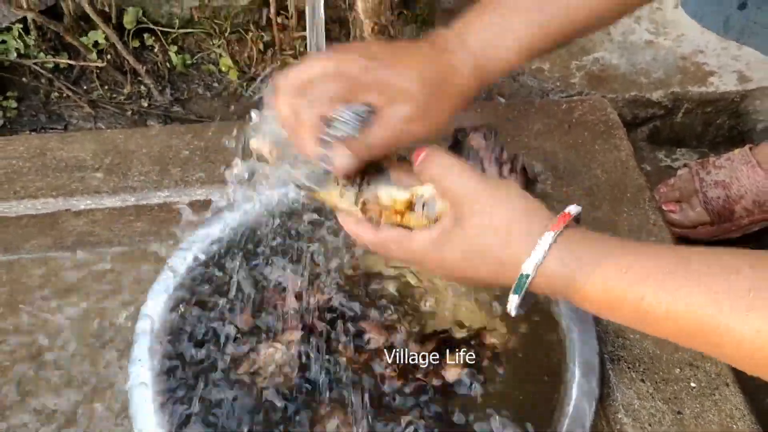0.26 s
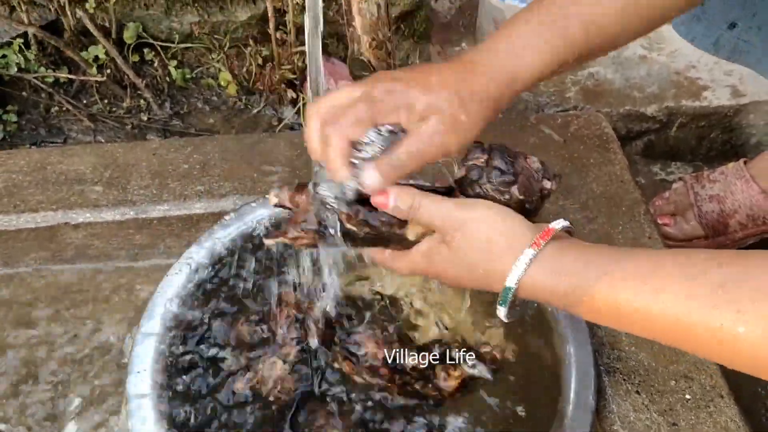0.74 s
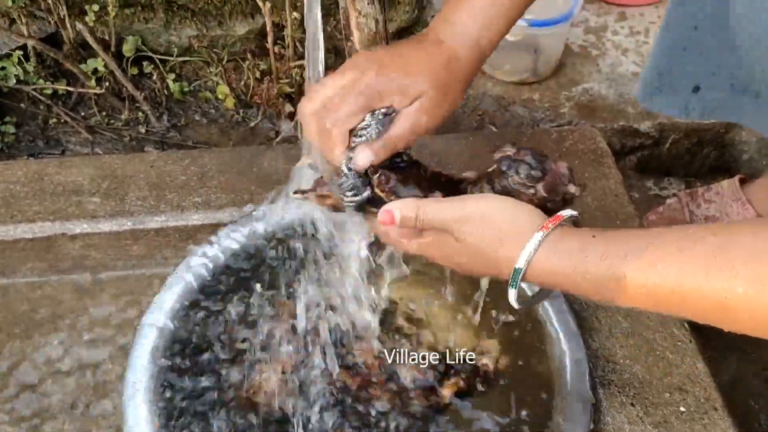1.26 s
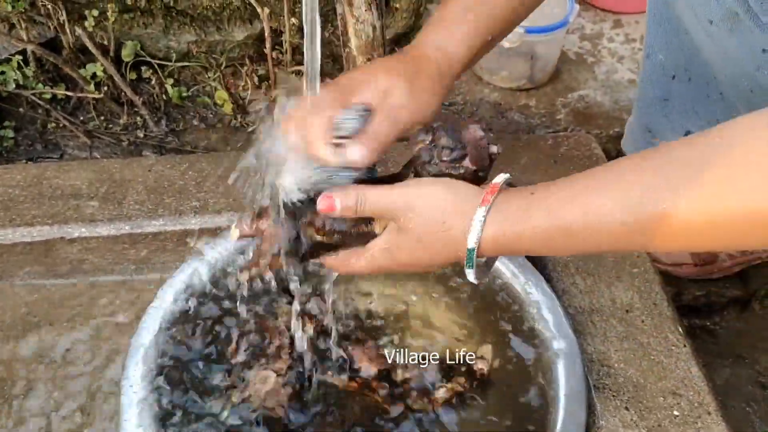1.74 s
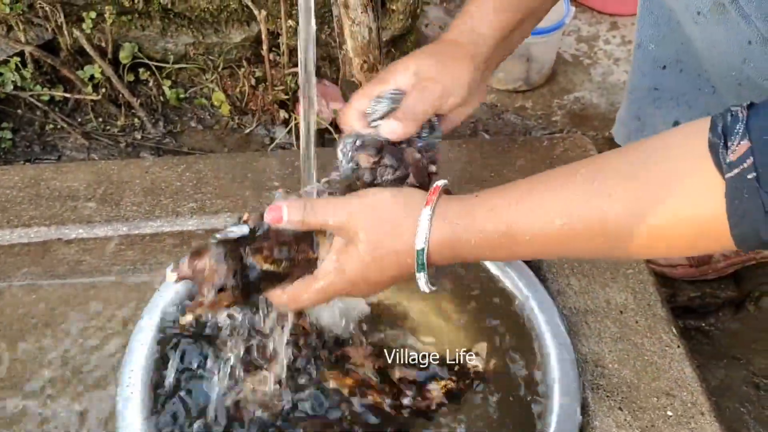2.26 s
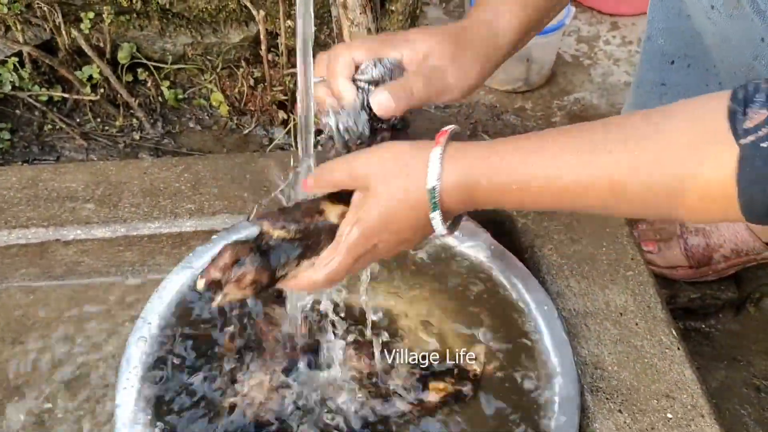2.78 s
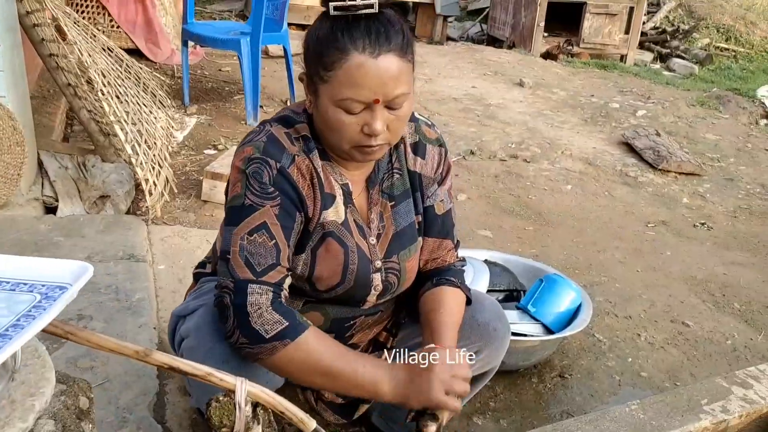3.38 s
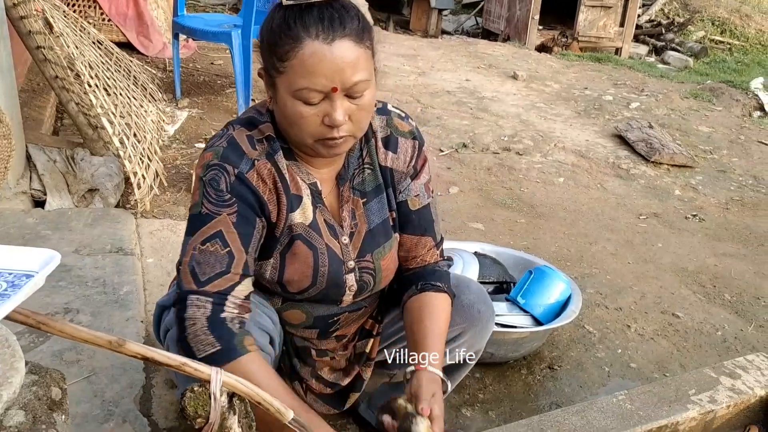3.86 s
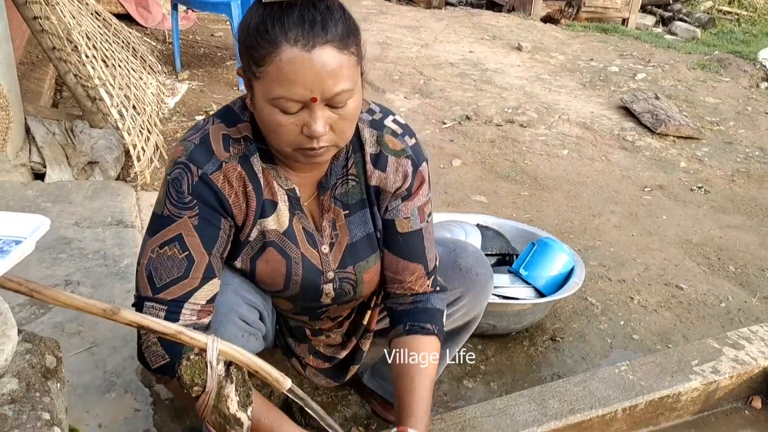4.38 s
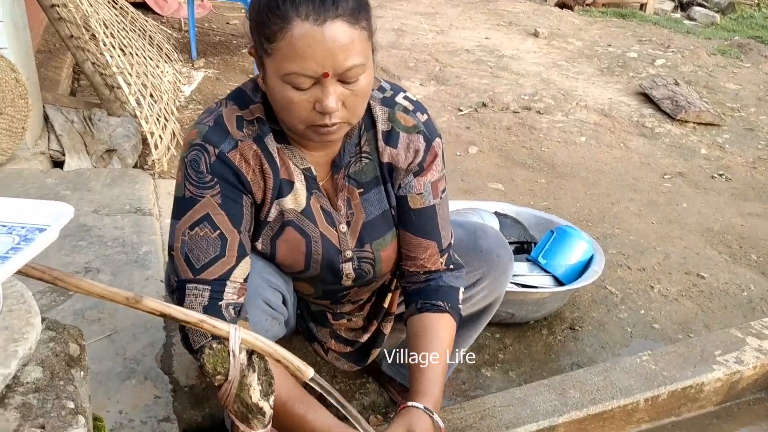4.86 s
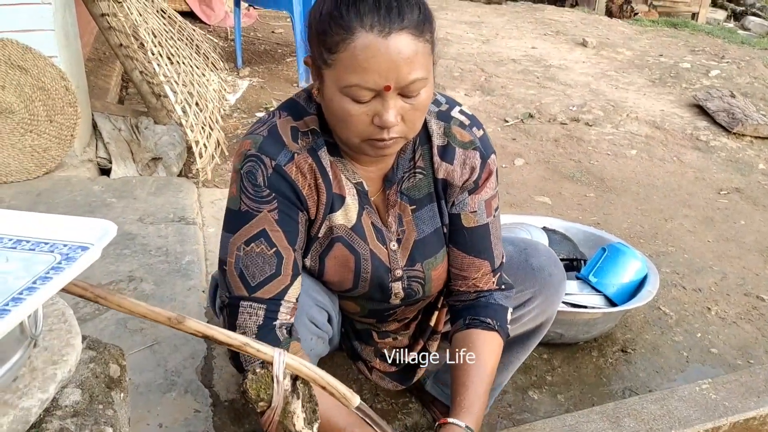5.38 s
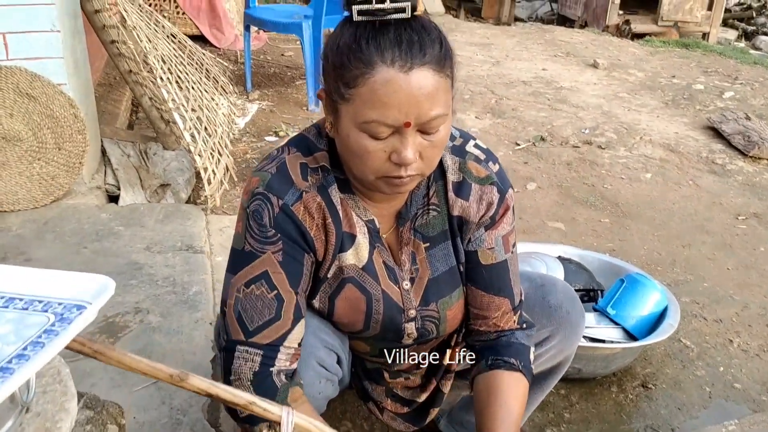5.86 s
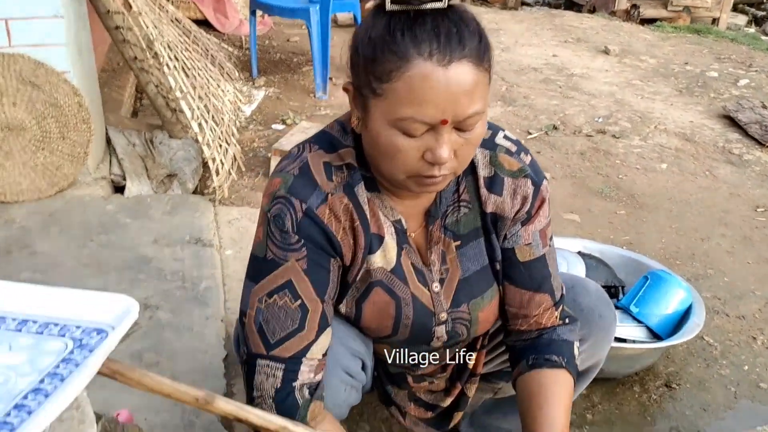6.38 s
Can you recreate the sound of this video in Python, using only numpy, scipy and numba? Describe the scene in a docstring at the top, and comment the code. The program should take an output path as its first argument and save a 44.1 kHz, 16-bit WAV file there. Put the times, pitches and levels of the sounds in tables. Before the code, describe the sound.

Outdoors, a steady stream falls into a water-filled steel basin, heard very close in stereo: bright ringing bubbles, spray hiss, quick plops and slaps as washing hands cut the flow. Just before three seconds a dull bump comes, then the same water sounds from a step away, softer and differently coloured, with glugs, occasional splashes and soft handling thuds over a low rumble. A short puff of air touches the right side near five seconds.

```python
"""Outdoors, a stream from a spout falls over hands scrubbing meat into a steel basin: first from just above it.
Clouds of ringing bubbles and filtered noise make fizz, spray, gurgle and glugs over a low rumble and drumming.
Single bubbles plop and gouts slap from the start; surges swell the water as the hands cut the stream.
After a dull bump the place becomes a step away: another colour, no drumming, more bumps as damped low swings.
Late on, a puff of air, low fluttering noise, reaches the right port of the microphone."""
import sys
import numpy as np
from scipy import signal
from scipy.fft import rfft, irfft
from scipy.io import wavfile
from numba import njit

SR = 44100
rng = np.random.default_rng(int(sys.argv[2]) if len(sys.argv) > 2 else 0)


def wav_record(signal):
    """Record a signal, one row per channel, as 16-bit PCM in the file named by sys.argv[1]."""
    frames = np.transpose(np.atleast_2d(signal))
    bounded = np.clip(frames, -1, 1)
    # unit amplitude maps onto the largest positive 16-bit level
    quanta = np.round(bounded * 32767).astype(np.int16)
    wavfile.write(sys.argv[1], SR, quanta)


N = 291942
T = np.arange(N) / SR
MOVE_S = 2.785  # before: just above the basin; after: a step away
TOP_HZ = 15650  # upper edge of the recorder's band
SURGE_ATTACK_S, SURGE_T60_S = 0.0086, 0.044
STROKE_ATTACK_S, STROKE_T60_S, LAPPING_DB = 0.016, 0.059, -55  # between strokes the water only laps
BROOD_ABOVE_DB, BROOD_ASIDE_DB = -4.5, -6.5  # from a step away single bubbles merge into the seethe

# Unbroken stream, as the hands hold it nearer to or further from the water: time_s, bubbles_db, spray_db
STREAM_LEVELS = [(0.0, -21.5, -36), (0.55, -25.5, -34.5), (1.2, -21, -35), (1.62, -29, -39.5),
                 (2.3, -22.5, -34.5), (2.75, -25.5, -34), (2.82, -29.5, -38), (3.3, -23.5, -36),
                 (3.85, -29.0, -37), (4.75, -25.5, -37.5), (5.3, -27, -39), (5.7, -27, -35),
                 (6.3, -28.5, -37), (6.62, -28, -43.5)]
# A hand or the meat cuts the stream and sheds a sheet of water: start_s, length_s, bubbles_db, spray_db
SHEET_SURGES = [(0, 0.036, -12, -32.5), (0.108, 0.091, -21, -38), (0.256, 0.079, -20.5, -33.5),
                (0.374, 0.11, -17, -30), (0.624, 0.12, -21, -33), (0.778, 0.1, -15.5, -34.5),
                (0.913, 0.183, -20, -39), (1.123, 0.066, -23.0, -33.5), (1.281, 0.15, -16.5, -34),
                (1.45, 0.12, -15.5, -30), (1.65, 0.11, -18.5, -32.5), (1.81, 0.17, -23.5, -43),
                (2.004, 0.081, -20.5, -39), (2.126, 0.17, -19, -40.5), (2.33, 0.14, -15.5, -32.5),
                (2.525, 0.069, -16, -55), (2.652, 0.13, -14.0, -38), (3.003, 0.092, -25.5, -56),
                (3.204, 0.04, -25, -43.0), (3.32, 0.26, -25, -38), (3.626, 0.066, -24, -53),
                (3.931, 0.16, -18.5, -33.5), (4.201, 0.15, -33, -34), (4.583, 0.076, -25, -30.5),
                (4.691, 0.065, -17.5, -35), (4.768, 0.16, -26, -36.5), (4.993, 0.19, -23, -35),
                (5.498, 0.021, -17, -37.5), (5.84, 0.057, -20, -34), (6.005, 0.072, -25, -41),
                (6.11, 0.244, -26, -41), (6.385, 0.028, -12.5, -29.5)]
# Colour of the water from just above the basin: frequency_hz, left_db, right_db
COLOUR_ABOVE = [(483, -13.5, -10.5), (790, -18, -21), (990, -23.5, -9), (1810, -14.5, -16.5),
                (2200, -10, -9.5), (2820, 1.5, -10.5), (3770, -13, -19.5), (4520, -11.5, -11.5),
                (4670, -16.5, -17.5), (6540, -21.5, -14.5), (7880, -34, -39.5), (9320, -45.5, -28),
                (12700, -35.5, -22), (14700, -28.5, -18)]
# Colour of the water from a step away: frequency_hz, left_db, right_db
COLOUR_ASIDE = [(540, -23, -9), (900, -11, -14), (1227, -8, -3), (1830, -6.5, -14.5), (2160, 3, 2.5),
                (3080, 7, -1.5), (3720, -5, -9.5), (4120, -11, -2.5), (5000, -17, -13.5), (6160, -17, -6),
                (7940, -32.5, -23.5), (9200, -40, -20), (12200, -32.5, -17.5), (14500, -32, -12)]
# Larger bubbles as water plunges into the basin: time_s, relative level_db
GURGLE_LEVELS = [(0.0, -33), (0.5, -39), (0.81, -47), (1.0, -36), (1.42, -37.5), (1.69, -45.5), (2.14, -38),
                 (2.75, -40.5), (3.08, -45), (3.48, -39), (3.75, -43.5), (4.45, -40.5), (4.83, -36.5),
                 (5.12, -32), (5.3, -45), (5.51, -34.5), (6.2, -38), (6.62, -40.5)]
# Strokes of the hands that churn the water: start_s, length_s, relative level_db
HAND_STROKES = [(0.0, 0.047, -47.5), (.915, 0.094, -40.5), (1.39, 0.17, -44), (1.75, 0.0079, -29.5),
                (2.41, 0.039, -38.5), (2.74, 0.033, -27.5), (3.40, 0.16, -33.5), (3.56, 0.18, -44.5),
                (4.12, .03, -39), (4.38, 0.025, -39.5), (4.58, 0.015, -40), (4.86, 0.032, -33),
                (5.075, 0.16, -35.5), (5.46, 0.12, -37.5), (5.61, 0.056, -38.5), (5.79, 0.095, -42.5),
                (6.01, 0.028, -31), (6.105, 0.041, -37), (6.31, 0.13, -36.5), (6.5, 0.15, -43.5)]
# Spectrum of the outdoor rumble: frequency_hz, gain_db
RUMBLE_COLOUR = [(15, -24), (25, -1), (92, 3), (151, -4.5), (270, 0), (352, -7), (403, -20), (479, -9),
                 (600, -26), (780, -43), (1320, -120)]
# Swell of the outdoor rumble: time_s, level_db
RUMBLE_LEVELS = [(0.0, -53), (0.31, -51.5), (1.45, -49), (1.73, -58.5), (2.93, -48.5), (3.54, -42),
                 (4.3, -50), (6.03, -48.5), (6.62, -52.5)]
# Single large bubbles: start_s, nominal pitch_hz, relative level_db, t60_s, left_minus_right_db
LARGE_BUBBLES = [(0.006, 1290, -7, 0.031, 0), (0.036, 870, -12.5, 0.05, -3), (0.131, 1216, -17.5, 0.047, 1),
                 (0.204, 1320, -18, 0.031, -3), (0.329, 1157, -9, 0.034, -2), (0.372, 955, -15, 0.09, -2),
                 (0.452, 1364, -9.5, 0.04, -1), (0.539, 1107, -19.5, 0.15, -10),
                 (0.61, 1310, -14, 0.022, -5), (0.754, 1136, -25, 0.13, -10),
                 (0.919, 850, -1.5, 0.026, -3.5), (1.025, 829, -13, 0.057, 2),
                 (1.129, 850, -18.5, 0.088, -6), (1.207, 786, -19, 0.043, 2), (1.26, 1480, -17.5, 0.04, 0),
                 (1.313, 1445, -13, 0.044, 4), (1.323, 836, -18, 0.058, 2), (1.375, 820, -24.5, 0.12, -4),
                 (2.116, 1080, -25.5, 0.082, -14), (2.153, 1745, -13.5, 0.11, 1),
                 (2.349, 1390, -16, 0.035, 0), (2.436, 1360, -12.5, 0.019, 0),
                 (2.697, 1115, -8.5, 0.027, -6), (4.528, 1160, -20.5, 0.053, 3),
                 (4.582, 880, -18.5, 0.13, -6), (4.749, 973, -19.5, 0.058, 3),
                 (4.813, 986, -17.5, 0.079, 0), (4.84, 1150, -17.5, 0.1, -7), (4.867, 983, -12, 0.048, 1),
                 (4.895, 745, -24.5, 0.087, 7), (5.157, 1012, -20.5, 0.11, 4), (5.188, 720, -16, 0.03, -1),
                 (5.232, 887, -21, 0.046, 3), (5.458, 1052, -18, 0.05, -7), (5.784, 913, -21, 0.16, 5),
                 (6.17, 1060, -15.5, 0.067, 2), (6.261, 1235, -19.5, 0.079, -5),
                 (6.524, 800, -20.5, 0.042, 2)]
# Heaviest gouts slapping down: start_s, nominal length_s, cavity pitch_hz, relative cavity_db, relative spray_db
WATER_SLAPS = [(0.009, 0.0083, 2750, -26, -40), (0.047, 0.0035, 2400, -21, -19),
               (0.202, 0.0062, 2970, -16.5, -31), (0.266, 0.005, 2440, -20, -30),
               (0.368, 0.008, 2800, -19.5, -33), (0.461, 0.0072, 3000, -13, -23),
               (0.632, 0.01, 4100, -24, -14), (0.727, 0.0036, 2720, -13, -26),
               (0.856, 0.0032, 3830, -10.5, -23), (0.962, 0.0058, 2260, -16, -20),
               (1.06, 0.034, 3120, -18, -20.5), (1.323, 0.019, 4070, -19, -24.5),
               (1.376, 0.0066, 2200, -17, -36), (1.462, 0.004, 2510, -17, -42),
               (1.521, 0.0023, 2960, -11.5, -11), (1.535, 0.0048, 2930, -15, -15),
               (1.593, 0.0047, 2000, -16.5, -42), (1.658, 0.0043, 3220, -21.5, -20),
               (1.687, 0.0022, 1960, -12.5, -41), (1.734, 0.0018, 3360, -11, -14.5),
               (1.76, 0.0038, 1820, -14, -19), (1.941, 0.002, 2830, -11, -46),
               (2.157, 0.017, 2710, -18, -34), (2.432, 0.03, 2600, -16, -17.5),
               (2.5, 0.0023, 3050, -17, -19), (2.542, 0.0038, 2620, -14, -36),
               (2.669, 0.0019, 2720, -11, -20), (2.711, 0.0014, 2580, -13.5, -27),
               (2.722, 0.0052, 2530, -11, -36), (3.023, 0.013, 2270, -22, -43),
               (3.979, 0.01, 2270, -19, -42), (4.012, 0.011, 4500, -20, -17),
               (4.284, 0.004, 2500, -19, -33), (4.291, 0.0033, 2300, -25, -13),
               (4.311, 0.0026, 4570, -12.5, -34), (5.018, 0.0061, 2260, -16.5, -33),
               (5.085, 0.0018, 3150, -7, -32), (5.855, 0.0054, 2960, -19, -11.5),
               (6.017, 0.0065, 2400, -25, -18), (6.382, 0.012, 2660, -18, -44),
               (6.495, 0.0069, 2690, -21, -28)]
# Resonances of the water-loaded steel basin: pitch_hz, width_hz, gain_db
BASIN_MODES = [(534, 24, -0.5), (850, 380, -2.5), (1064, 44, -9.5), (1413, 196, 0), (2110, 27, -19)]
# Dull bumps of handling: start_s, relative level_db, pitch_hz, left_minus_right_db, nominal t60_s
HANDLING_BUMPS = [(2.524, -22, 134, 29, 0.12), (2.612, -33.5, 115, 23, 0.32), (2.663, -27, 134.6, 31, 0.23),
                  (2.746, -11.5, 119, 23, 0.041), (3.087, -22, 143, 27, 0.077),
                  (3.505, -18.5, 325, -22, 0.067), (4.131, -30.5, 380, -7, 0.057),
                  (4.581, -34, 67.3, 0, 0.086), (5.185, -28.5, 380, -2, 0.082), (6.019, -32, 201, 15, 0.1),
                  (6.114, -10, 195, 32, 0.017)]
# Puff of air on the right port: time_s, relative level_db
PUFF_LEVELS = [(4.86, -64), (4.91, -19.5), (4.96, -27), (5.005, -30), (5.035, -74)]


def undb(db):
    """Decibels to gain."""
    return 10 ** (np.asarray(db) / 20)


def unit(x):
    """Scale a sound so that the mean of its channels has rms 1."""
    return x / np.sqrt(np.mean(x.mean(0) ** 2) + 1e-18)


def sides(pan_db):
    """Left and right gains with mean 1."""
    gains = undb(np.array([[pan_db], [-pan_db]]) / 2)
    return gains / gains.mean()


def curve(table):
    """Gain over the scene, drawn in dB between rows of time_s, level_db."""
    return undb(np.interp(T, *np.transpose(table)))


def noise_band(lo_hz, hi_hz, size=N):
    """One channel of band-limited noise at unit level."""
    return unit(band(rng.standard_normal((1, size)), lo_hz, hi_hz))


def add(out, s, x):
    """Mix x into out from time s."""
    i = max(int(s * SR), 0)
    out[:, i:i + x.shape[1]] += x[:, :max(N - i, 0)]


def band(x, lo_hz, hi_hz, order=2):
    """Causal band-pass."""
    sos = signal.butter(order, [lo_hz, min(hi_hz, .45 * SR)], "band", fs=SR, output="sos")
    return signal.sosfilt(sos, x)


def colour(x, table, size=1024):
    """Minimum-phase filter through rows of frequency_hz and one gain_db, or left_db and right_db."""
    hz, *columns = np.transpose(table)
    grid = np.log(np.maximum(np.fft.rfftfreq(size, 1 / SR), 1))
    gains = undb([np.interp(grid, np.log(hz), c) for c in columns])
    # folding the cepstrum forward puts all of the response after the impulse
    cepstrum = irfft(np.log(gains))
    cepstrum[:, 1:size // 2] *= 2
    cepstrum[:, size // 2 + 1:] = 0
    response = irfft(np.exp(rfft(cepstrum)))
    return signal.fftconvolve(x, response, axes=1)[:, :x.shape[1]]


@njit
def ring(start, hz, t60, rise, size, n):
    """Damped sines that swell for a cycle or two; the pitch climbs ever faster as each nears the surface."""
    out = np.zeros(n)
    for k in range(len(start)):
        first = max(int(start[k] * SR) + 1, 0)
        for i in range(first, min(first + int(t60[k] * SR) + 1, n)):
            t = i / SR - start[k]
            age = t / t60[k]
            swell = 1 - np.exp(-t * hz[k])
            climb = 1 + rise * age * (.3 + age)
            out[i] += size[k] * swell * np.exp(-6.9 * age) * np.sin(2 * np.pi * hz[k] * t * climb)
    return out


def ring_pair(start, lag, hz, t60, rise, level_db, pan_db):
    """Ring the same bubbles at both ports, with half the lag (s) and balance (dB) on each side."""
    return np.array([ring((start + e * lag / 2).ravel(), hz.ravel(), t60.ravel(), float(rise),
                          undb(level_db + e * pan_db / 2).ravel(), N) for e in (1, -1)])


def cloud(rate, lo_hz, hi_hz, cycles, spread_db, rise, scatter_ms, scatter_db, count=1):
    """Bubbles or droplets at loose times and places, `rate` a second, in broods of `count` of like pitch."""
    total = int(rate * N / SR)
    u = rng.random((total, 8)).T
    k = np.arange(total)
    start = (k + 4 * u[0] - 2) / rate
    pitch = (u[7][k - k % count] + 0.2184 * u[1]) % 1
    hz = lo_hz * (hi_hz / lo_hz) ** pitch
    # with a spread, many are small and a few large; higher pitches start stronger
    size = undb(spread_db * -np.log(.04 + .96 * u[2])) * np.sign(u[6] - .5) * hz / lo_hz
    t60 = cycles * 2 ** (2 * u[3] - 1) / hz
    # each place has its own lag and balance between the two ports
    lag = scatter_ms * (2 * u[4] - 1) / 1000
    pan_db = scatter_db * (2 * u[5] - 1)
    return np.array([ring(start + e * lag / 2, hz, t60, float(rise), size * undb(e * pan_db / 2), N)
                     for e in (1, -1)])


def heard(x):
    """A steady sound coloured as from each of the two places, both at unit level."""
    return np.where(T < MOVE_S, unit(colour(x, COLOUR_ABOVE)), unit(colour(x, COLOUR_ASIDE)))


def swells(events, attack_s, t60_s, steady_db):
    """Gain of a steady level plus rows of start_s, length_s, level_db: each rises, holds, drains; powers add."""
    power = undb(steady_db) ** 2 * np.ones(N)
    for start, length, db in events:
        first = max(int(start * SR), 0)
        age = T[first:first + SR] - start
        drain_db = -60 * np.maximum(age - length, 0) / t60_s
        gain = np.clip(age / attack_s, 0, 1) * undb(db + drain_db)
        power[first:first + SR] += gain ** 2
    return np.sqrt(power)


def flow():
    """Gains of the bubbles and of the spray: the stream with its surges on top."""
    s, *steady = np.transpose(STREAM_LEVELS)
    start, length, *peaks = np.transpose(SHEET_SURGES)
    return [swells(zip(start, length, peak), SURGE_ATTACK_S, SURGE_T60_S, np.interp(T, s, db))
            for db, peak in zip(steady, peaks)]


def gouts(rate, depth_db, tail_s):
    """The stream breaks into lumps: each lands at once and drains away. A gain with rms 1."""
    u = rng.random((2, N))
    lumps = (u[0] < rate / SR) * (.5 + u[1])
    load = signal.lfilter([1], [1, -np.exp(-1 / (tail_s * SR))], lumps)
    gain = 1 + undb(depth_db) * load
    return gain / np.sqrt(np.mean(gain ** 2))


def fizz(gain):
    """Broods of small ringing bubbles over an even seethe, beaten in by the lumps of the stream."""
    broods = cloud(440, 1589.7, 4640, cycles=82, spread_db=5.0, rise=0.063,
                   scatter_ms=.05, scatter_db=8.5, count=4)
    seethe = cloud(2800, 1663, 4374, cycles=22, spread_db=0.0, rise=0.061, scatter_ms=0.051, scatter_db=5.5)
    brood_gain = undb(np.where(T < MOVE_S, BROOD_ABOVE_DB, BROOD_ASIDE_DB))
    bubbles = brood_gain * heard(broods) + undb(-7.0) * heard(seethe)
    return bubbles * gouts(rate=32, depth_db=-3.0, tail_s=0.011) * gain


def spray(gain):
    """Tiny bubbles ping over a fine patter of droplets and a hiss of mist."""
    pings = cloud(520, 3563, 7400, cycles=183, spread_db=7.0, rise=0.042,
                  scatter_ms=0.035, scatter_db=11.5, count=4)
    patter = cloud(4500, 4577, 15500, cycles=53, spread_db=3.5, rise=0.015, scatter_ms=0.079, scatter_db=3.0)
    mist = rng.standard_normal((2, N)) + 0.5 * rng.standard_normal(N)
    fine = undb(-1.0) * heard(patter) + undb(-3.5) * heard(band(mist, 5700, 12700))
    lumpy_fine = fine * gouts(rate=40, depth_db=-4.0, tail_s=0.011)
    return (undb(-2.5) * heard(pings) + lumpy_fine) * gain


def gurgle():
    """Larger bubbles chirp upwards in the wash of the basin."""
    chirps = cloud(95, 694.6, 2000, cycles=56.2, spread_db=4.5, rise=0.164, scatter_ms=0.29, scatter_db=35)
    wash = cloud(900, 631, 1810, cycles=18.4, spread_db=2.5, rise=0.26, scatter_ms=0.28, scatter_db=11)
    return (undb(-1.3) * heard(chirps) + undb(-10.0) * heard(wash)) * curve(GURGLE_LEVELS)


def churn():
    """Short low glugs of water pushed about by the hands."""
    glugs = cloud(420, 278, 926, cycles=21.0, spread_db=3.0, rise=0.091, scatter_ms=0.5, scatter_db=7)
    return unit(glugs) * undb(-4.0) * swells(HAND_STROKES, STROKE_ATTACK_S, STROKE_T60_S, LAPPING_DB)


def yard_rumble():
    """Coloured low noise, partly shared by both ports; by the basin only its 42 to 256 Hz band arrives."""
    noise = rng.standard_normal((2, N)) + 0.64 * rng.standard_normal(N)
    rumble = unit(colour(noise, RUMBLE_COLOUR, size=8192))
    return np.where(T < MOVE_S, band(rumble, 42, 256), rumble) * curve(RUMBLE_LEVELS)


def basin_drumming():
    """Low drumming of the stream in the basin: narrow-band noise, heard only from close by."""
    return noise_band(102, 140) * sides(4.9) * undb(-49.5) * (T < MOVE_S)


def plops(rise=0.123, daughter_db=-11, lag_ms=0.39, count=4):
    """A large bubble rings and climbs in pitch; smaller ones of like pitch pinch off in its wake."""
    s, hz, db, t60, pan_db = np.transpose(LARGE_BUBBLES)[:, :, None]
    late, detune, side = np.moveaxis(rng.random((len(LARGE_BUBBLES), count, 3)), 2, 0)
    daughter = np.arange(count) > 0  # the first of each group is the large bubble
    s = s + daughter * late * .032
    hz = hz * (.985 + daughter * (0.438 * detune - .16))
    db = db + daughter * daughter_db
    lag = (side - .5) * lag_ms / 1000
    t60 = t60 * np.where(daughter, .7, 1)
    return ring_pair(s, lag, hz, t60, rise, db, pan_db)


def slaps(splash_db=-7, spray_db=-2, cavity_cycles=45, rise=0.04, drop_rate=1500, size=2048):
    """A gout lands as a quick run of drops: they ring an air cavity and throw off spray."""
    out, t = np.zeros((2, N)), np.arange(size) / SR
    for s, length, hz, body_db, mist_db in WATER_SLAPS:
        place = COLOUR_ABOVE if s < MOVE_S else COLOUR_ASIDE
        length = max(length, .002)
        landing = t / length * np.exp(-3 * t / length)
        drops = rng.standard_normal(size) * (rng.random(size) < drop_rate / SR) * landing
        drops[0] = 0.39  # first contact
        # a short sharp smack leaves a cavity that collapses at once
        t60 = min(cavity_cycles / hz, 5 * length)
        bubble = ring(np.zeros(1), np.array([hz], float), np.array([t60]), float(rise), np.ones(1), size)
        cavity = band(signal.fftconvolve(drops, bubble)[:size], 0.52 * hz, 2.74 * hz)
        burst = landing * (rng.standard_normal(size) + rng.standard_normal((2, size)))
        splash = colour(band(burst, 1130, 7400), place)
        mist = colour(band(burst, 4300, 13100), place)
        body = unit(colour(np.array([cavity, cavity]), place)) + undb(splash_db) * unit(splash)
        slap = undb(body_db) * body + undb(mist_db + spray_db) * unit(mist)
        add(out, s, np.sqrt(length * SR / size) * slap)  # longer landings carry more energy
    return out


def basin(x):
    """The bowl rings briefly with whatever lands in it."""
    out = x
    for hz, width, db in BASIN_MODES:
        out = out + undb(db) * signal.lfilter(*signal.iirpeak(hz, hz / width, fs=SR), x)
    return out


def yard(x, t60=0.11, echo_db=-12, size=8192):
    """Rim, ground and arms send back short echoes, their pattern redrawn for each overlapping piece of sound."""
    out, t = x.copy(), np.arange(size) / SR
    for i in range(0, N - size // 2, size // 2):
        echoes = rng.standard_normal((2, size)) * undb(-60 * t / t60) * (t > .002)
        echoes /= np.sqrt(np.sum(echoes ** 2, axis=1, keepdims=True))
        piece = x[:, i:i + size]
        piece = piece * np.hanning(size)[:piece.shape[1]]
        add(out, i / SR, undb(echo_db) * signal.fftconvolve(piece, echoes, axes=1))
    return out


def bumps(size=8192):
    """Soft blows: one damped low swing with a scuff of rumble and a brief dull contact."""
    out, t = np.zeros((2, N)), np.arange(size) / SR
    for s, db, hz, pan_db, t60 in HANDLING_BUMPS:
        scuff = noise_band(88, 180, size)
        contact = noise_band(220, 570, size) * np.exp(-t / 0.0057)
        swing = np.sin(2 * np.pi * hz * t)
        blow = (swing + 0.52 * scuff) * undb(-60 * t / max(t60, .02)) + 0.15 * contact
        onset = 1 - np.exp(-t / 0.0032)
        add(out, s, undb(db + 3.5) * sides(pan_db) * blow * onset)
    return out


def puff():
    """Air flutters on the right port of the microphone: two low bands of noise under one short swell."""
    flutter = noise_band(49, 77) + 0.29 * noise_band(96, 124)
    return sides(-30) * flutter * curve(PUFF_LEVELS) * undb(-2.5)


def scene():
    """All the water in the basin and the yard, with the low sounds at the microphone."""
    bubble_gain, spray_gain = flow()
    water = fizz(bubble_gain) + spray(spray_gain) + gurgle() + churn() + plops() + slaps()
    low_sounds = yard_rumble() + basin_drumming() + bumps() + puff()
    return yard(undb(-1.0) * basin(water)) + low_sounds


def record(dry):
    """The recorder rounds the highest peaks and cuts the top."""
    rounded = dry / (1 + dry ** 4) ** .25
    return signal.sosfilt(signal.ellip(10, .2, 90, TOP_HZ, fs=SR, output="sos"), rounded)


dry = scene()
out = record(dry)
wav_record(out)
```